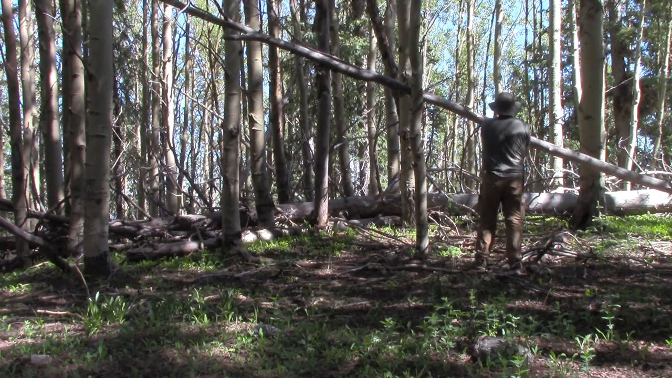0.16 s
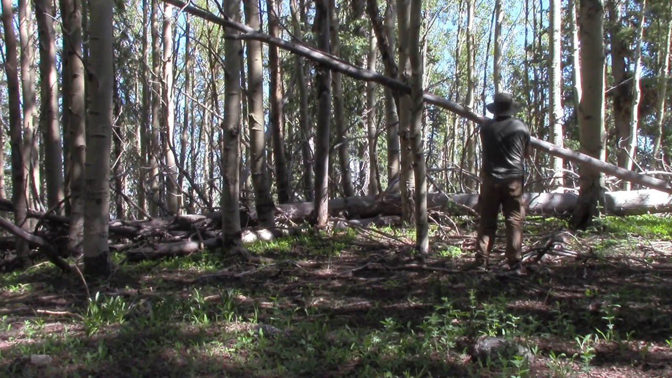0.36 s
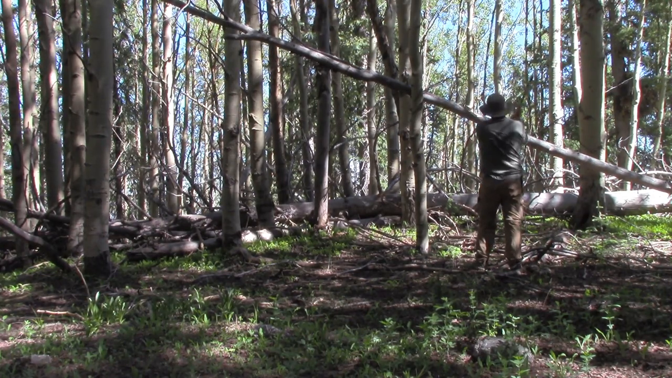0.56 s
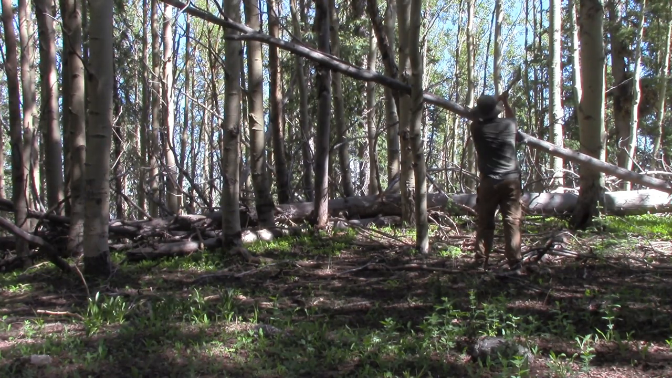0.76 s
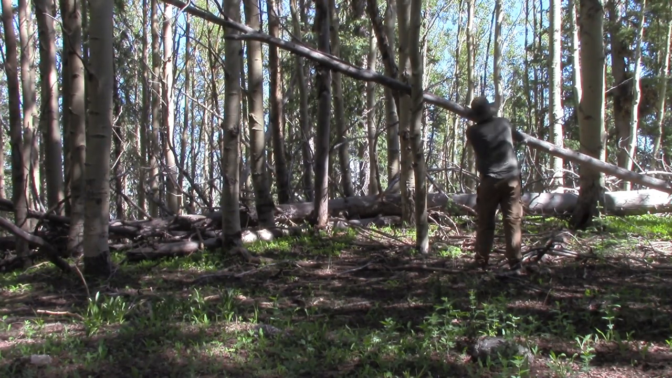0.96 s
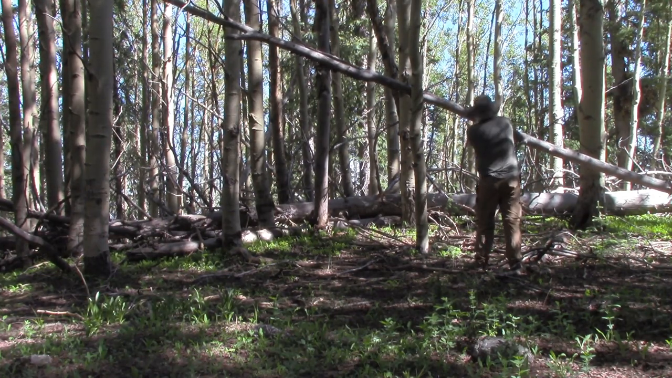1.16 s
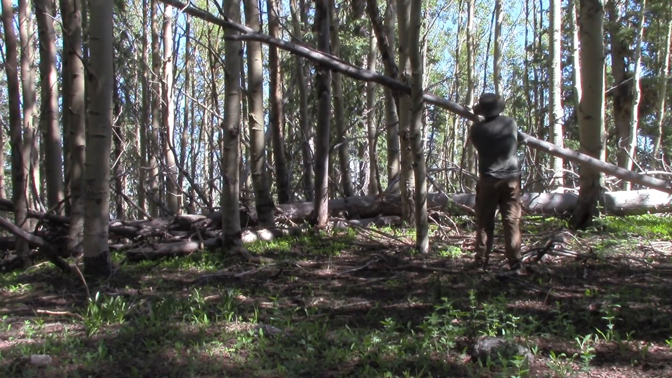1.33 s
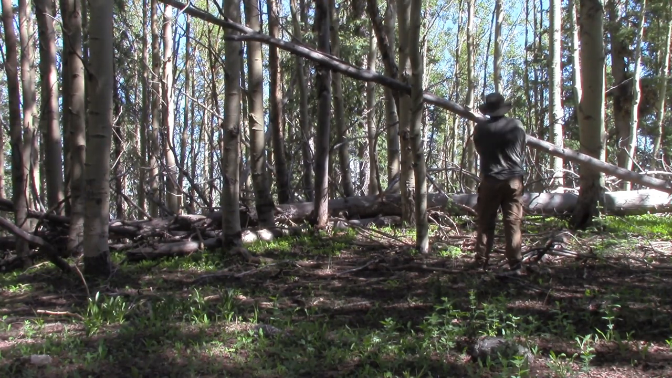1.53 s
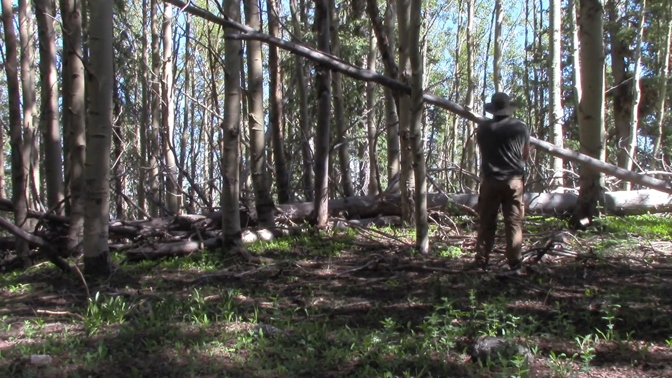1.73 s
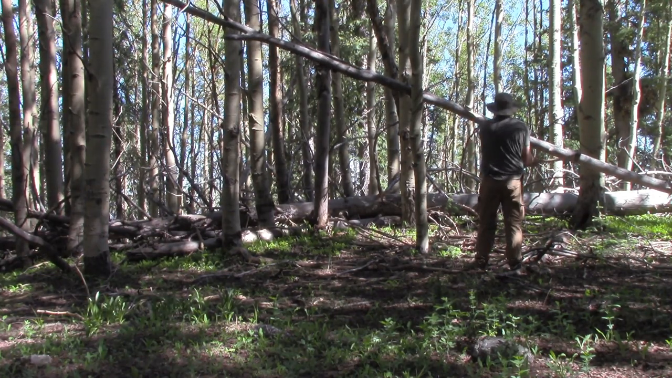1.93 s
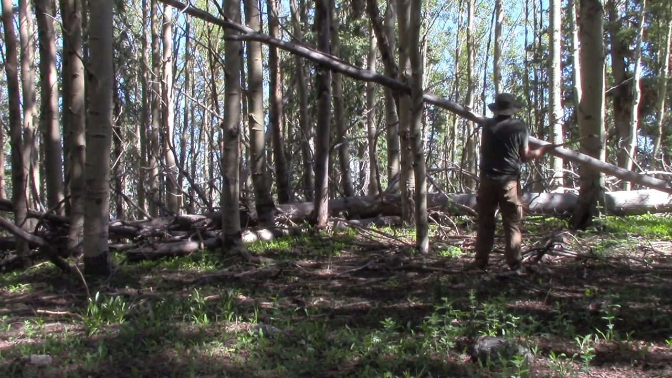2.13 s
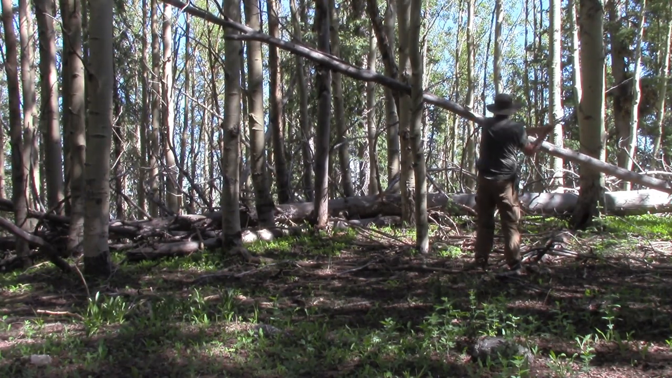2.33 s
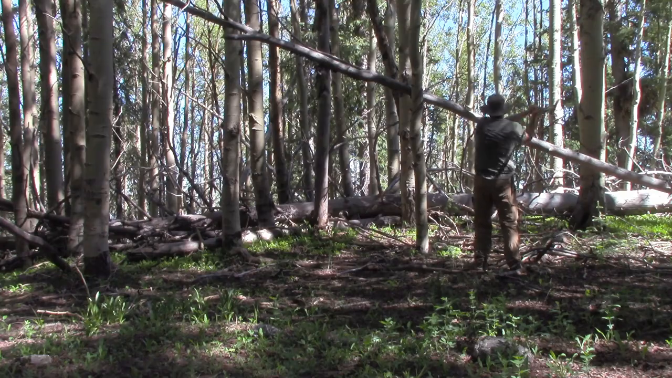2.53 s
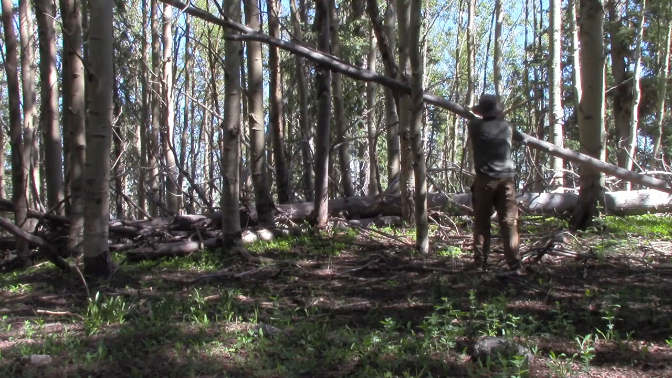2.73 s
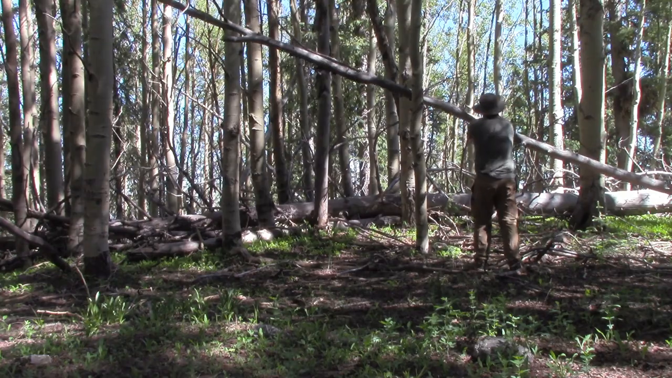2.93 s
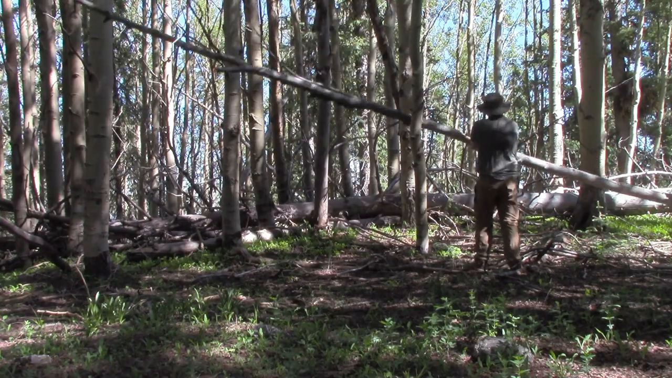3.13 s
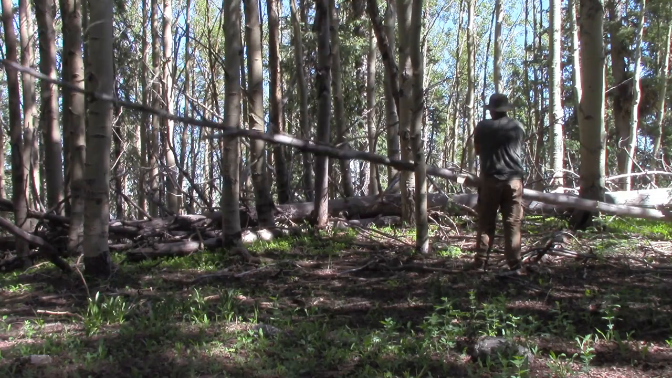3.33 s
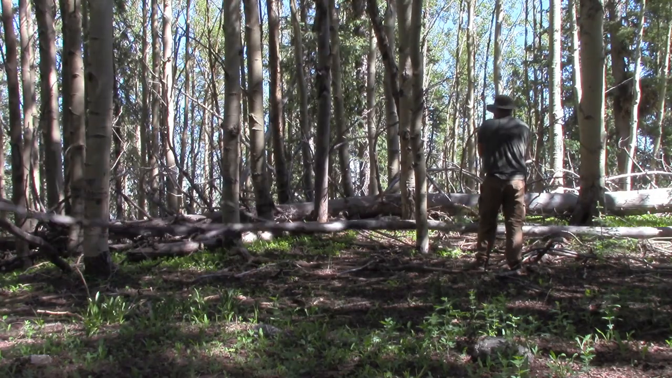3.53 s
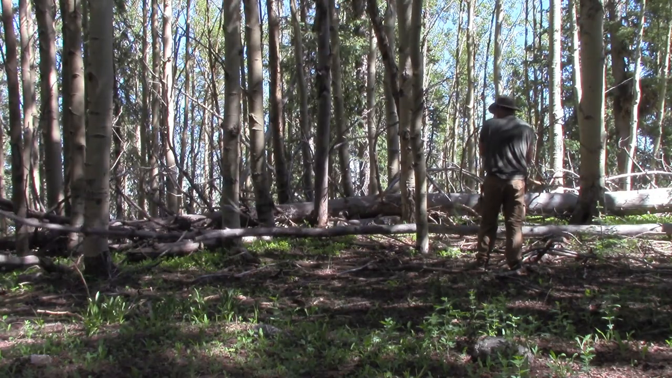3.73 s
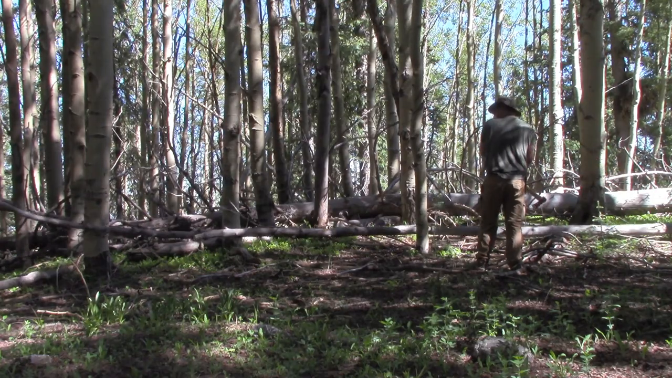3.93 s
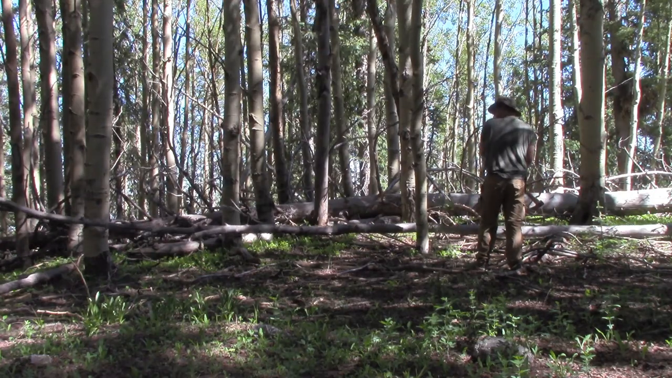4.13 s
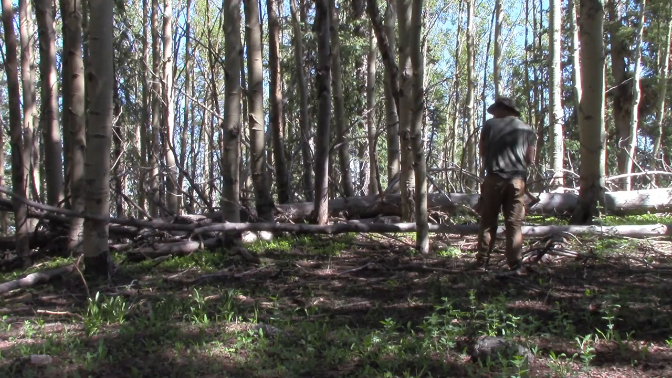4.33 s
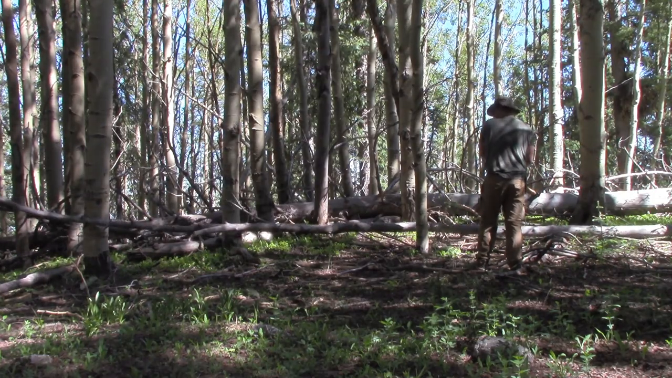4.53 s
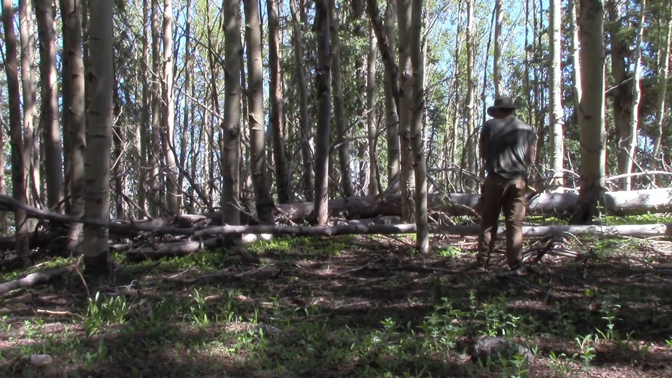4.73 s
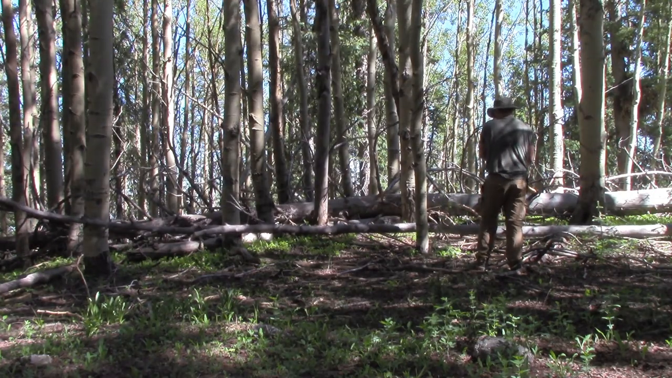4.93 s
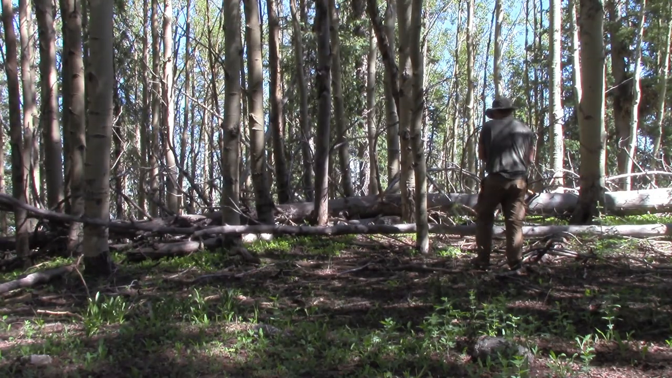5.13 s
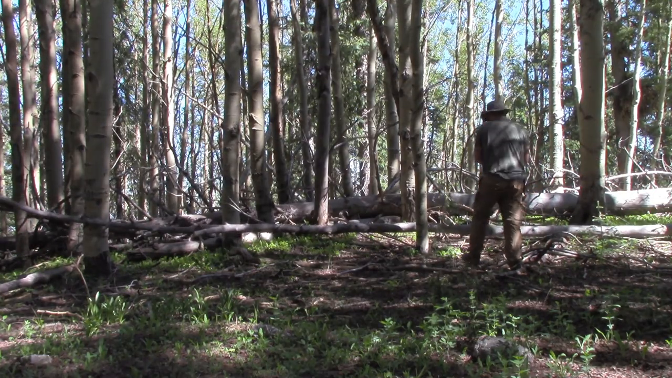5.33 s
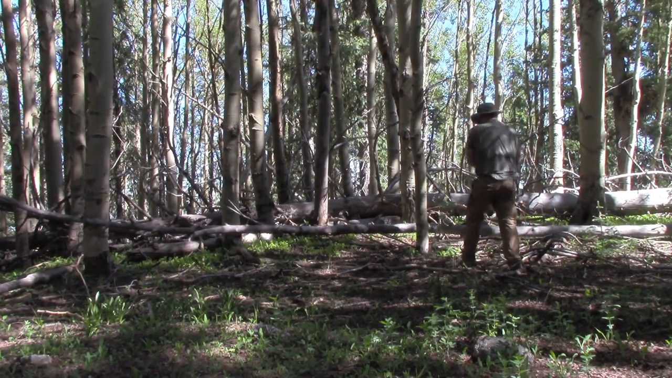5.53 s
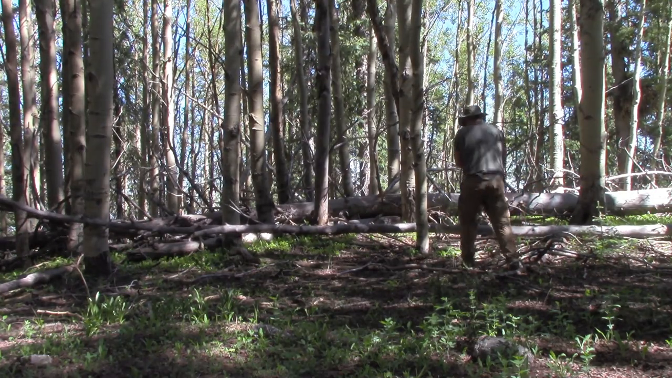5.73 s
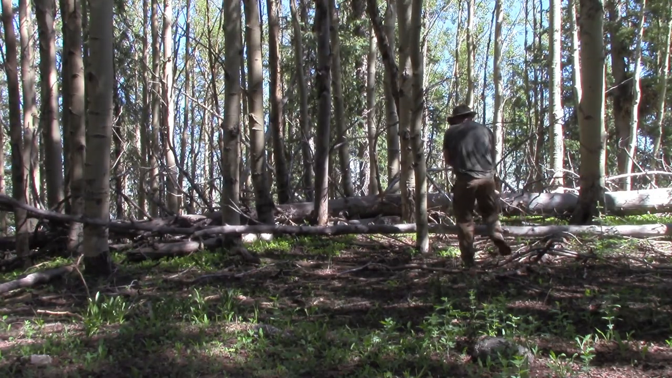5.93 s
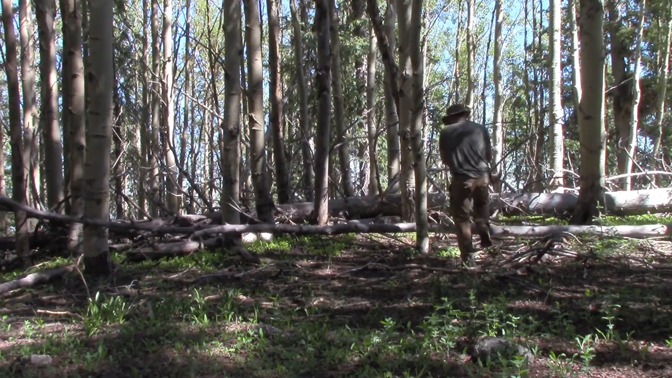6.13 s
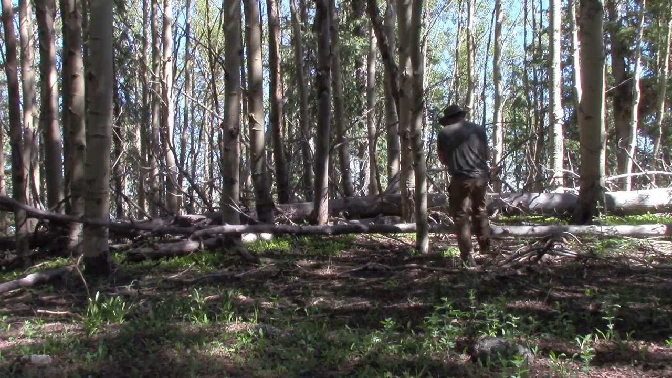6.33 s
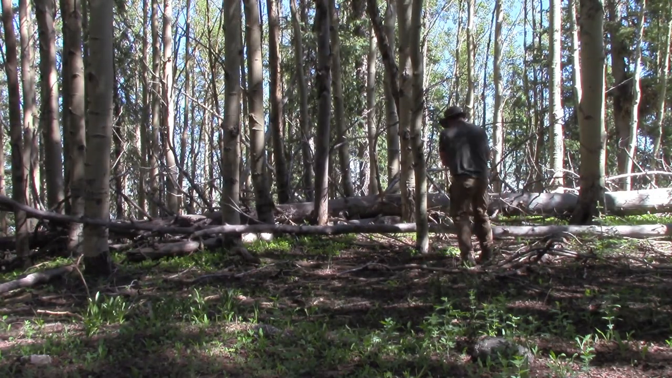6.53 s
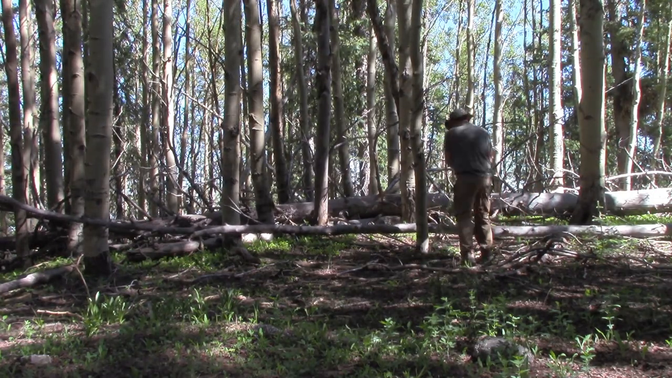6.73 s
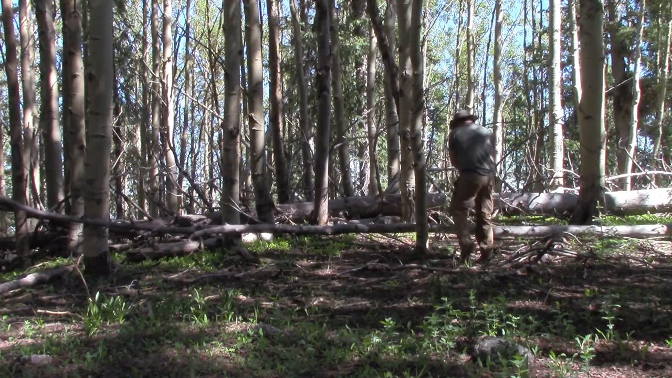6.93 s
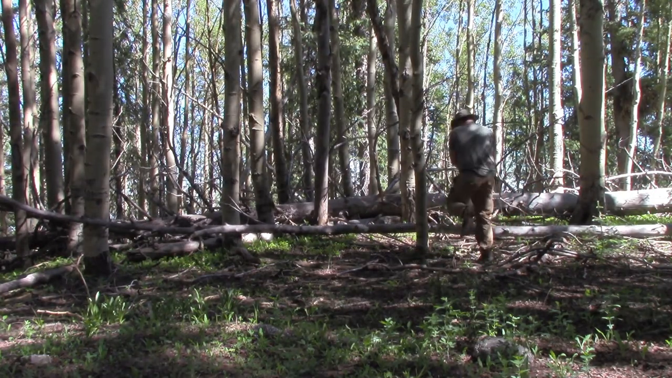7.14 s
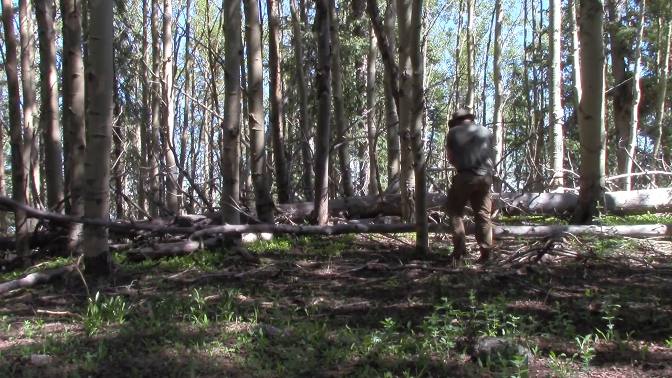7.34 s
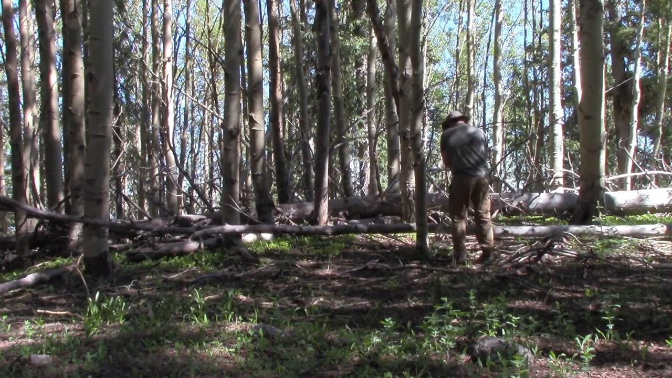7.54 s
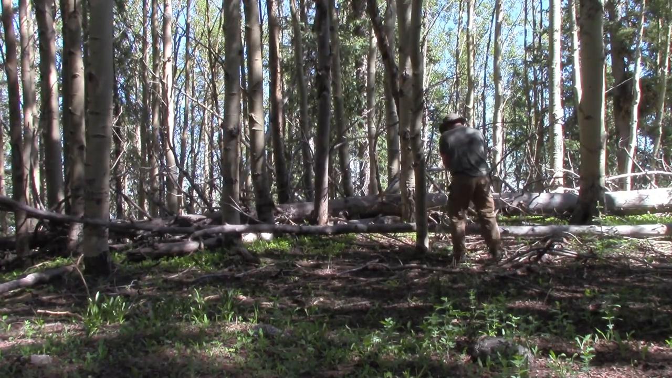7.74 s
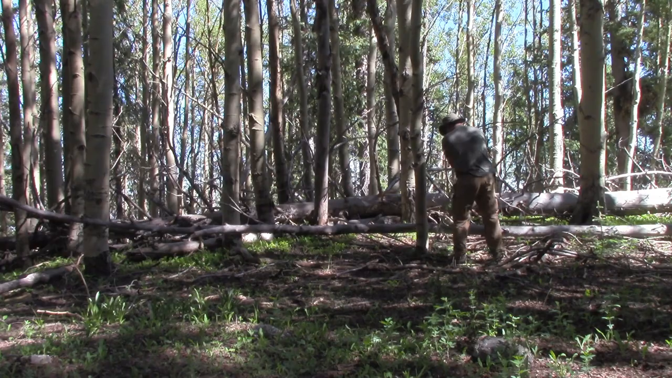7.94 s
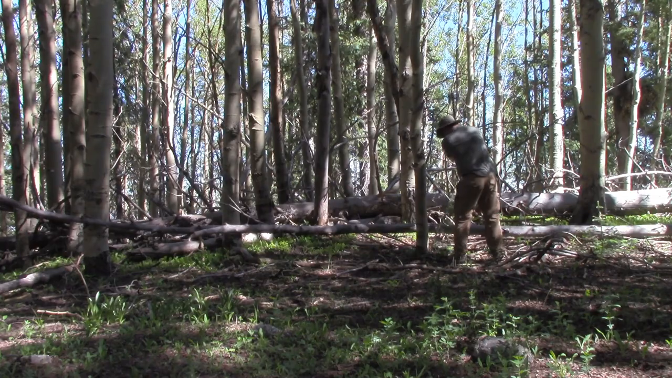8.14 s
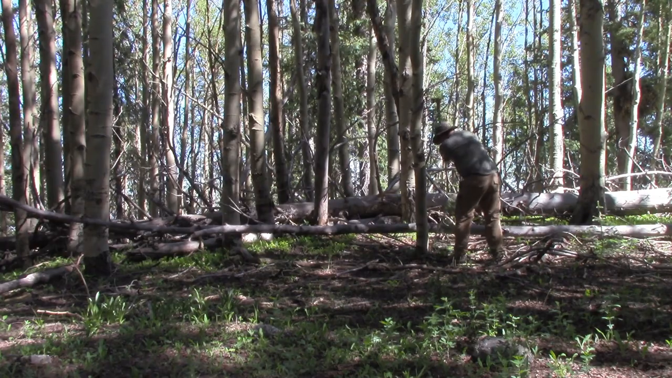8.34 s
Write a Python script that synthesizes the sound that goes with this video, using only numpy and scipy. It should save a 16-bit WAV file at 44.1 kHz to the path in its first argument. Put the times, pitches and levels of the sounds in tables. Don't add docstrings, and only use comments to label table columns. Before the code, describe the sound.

An axe chops twice into a dead leaning trunk in a forest; the wood splits, crashes down with dense cracking, bounces, and boots rustle leaves.

```python
import sys
import numpy as np
from scipy import signal
from scipy.fft import rfft, irfft, next_fast_len
from scipy.io import wavfile
from scipy.ndimage import uniform_filter1d, map_coordinates

SR = 44100
rng = np.random.default_rng(int(sys.argv[2]) if len(sys.argv) > 2 else 0)


def ratio(d):
    e = np.asarray(d, float) / 20
    return 10 ** e


def file_out(sig):
    cols = np.atleast_2d(sig).T
    lim = np.clip(cols, -1, 1)
    pcm = np.round(lim * 32767).astype(np.int16)
    wavfile.write(sys.argv[1], SR, pcm)


N = 373527
TIME = np.arange(N) / SR

# f/Hz, level/dB
AIR_SPECTRUM = [(15, -48.5), (25, -13.5), (123, -12.5), (152, -18), (255, -5), (414, -6.5), (473, -2.5),
                (572, -6), (672, -4.5), (1820, -13), (3220, -15), (3490, -13.5), (5670, -17),
                (15800, -25.5)]

# t/s, effort/dB
BOOT_EFFORT = [(4.9, -48.5), (5.19, -55), (5.43, -52), (5.78, -49), (6.0, -62), (6.57, -64), (6.78, -55.5),
               (7.0, -56.5), (7.19, -62), (7.4, -60), (7.72, -46), (7.97, -59.5), (8.15, -70), (8.47, -65)]
# t/s, peak level/dB, edge level/dB, t60/s, snap f/Hz
FOOTFALLS = [(5.765, -30.5, 5, 0.23, 3000), (5.826, -31, -1.5, 0.23, 3470), (6.053, -37.5, 5, 0.059, 3040),
             (6.575, -35, 6.5, 0.38, 3020), (6.635, -44, 13, 0.14, 3040), (6.9, -33, 8, 0.26, 2460),
             (7.122, -39.5, 5, 0.1, 2980), (7.365, -26.5, 8.5, 0.23, 3320), (7.64, -33, 14, 0.14, 2950)]
# t/s, peak level/dB, t60/s, main mode f/Hz
HEEL_THUMPS = [(6.645, -46.5, 0.065, 380), (6.89, -46, 0.22, 325), (7.37, -39.5, 0.059, 354),
               (7.53, -45.5, 0.3, 298), (7.61, -47.5, 0.17, 333), (7.81, -41, .04, 356)]

# t/s, peak level/dB, edge level/dB, snap f/Hz
BARK_SNAPS = [(0.0014, -37, -22, 2860), (0.6454, -41, -21, 4060), (0.0618, -40, -26.5, 2650),
              (0.1226, -32, 9, 2720), (0.08, -42, -20, 2600), (0.155, -38, -11, 1760),
              (0.178, -37, -2, 4600), (0.399, -42, -15, 2800), (0.2282, -28, 0, 3480),
              (0.243, -34, 3, 3300), (0.3075, -30.5, 5, 5760), (0.3288, -33.5, -0.5, 3440),
              (0.4224, -34.5, 6, 3780), (0.6025, -34.5, 4, 1660), (0.687, -27.5, 6, 3720),
              (0.737, -37, -9, 3000)]
# t/s, peak level/dB, edge level/dB, snap f/Hz
CHIP_SNAPS = [(1.1462, -22, -38, 2900), (1.1614, -31, -35, 2100), (1.2, -32, -26, 2800),
              (1.289, -28.5, -33, 3270), (1.354, -34.5, -31, 1760), (1.4446, -35.5, -35, 1850),
              (1.5229, -36, -24, 2690), (1.6024, -32, -9, 3230), (1.6841, -29, -28, 3020),
              (1.8284, -33, -3, 1390), (1.8791, -37.5, -23, 2160), (1.9515, -40, -9, 4550),
              (2.0994, -43.5, -3, 4700), (2.151, -37, -31, 3160)]
# t/s, peak level/dB, edge level/dB, snap f/Hz
SPLIT_SNAPS = [(2.898, -15, -19.5, 2680), (2.9527, -14.5, -7.5, 3670), (2.9795, -19, -13.5, 3670),
               (3.0456, -26, -41, 2650), (3.0637, -24, -35.5, 4500), (3.1382, -23.5, -48, 1930),
               (3.1597, -18.5, -32, 2550), (3.1787, -18.5, -16, 3670), (3.2595, -12, -14, 2740),
               (3.358, -8, -18, 2950), (3.401, -17.5, -20, 3500), (3.437, -20, -27, 2500)]
# t/s, peak level/dB, edge level/dB, snap f/Hz
CRASH_SNAPS = [(3.496, -11, -6, 3450), (3.5043, -11, -3, 2840), (3.5165, -9, 5, 3600),
               (3.51, -12, -16, 3100), (3.525, -12, -15, 3000), (3.55, -19, -21, 3000),
               (3.5637, -4.5, -5, 1590), (3.582, -3, -1, 2580), (3.5923, -3, -7, 3340),
               (3.613, -3, -34, 1530), (3.6324, -29, -30, 1455), (3.6486, 0, -5, 2670),
               (3.658, -6, -7, 1350), (3.674, -6, -2, 3530), (3.6999, -9, -23, 3000),
               (3.7155, -5, -25, 2300), (3.768, -10.5, 5, 7840), (3.8153, -13, 16, 4640),
               (3.8257, -9, 14, 1780), (3.8379, -9.5, 1, 1820), (3.881, -10, -6, 2510),
               (3.8924, -8, -4, 3160), (3.917, -18, -10, 2800), (3.956, -6, -6, 2720),
               (3.9647, -7, -1, 1570), (3.972, -18, -1, 3800), (3.98, -12.5, -15, 1620),
               (4.0248, -16.5, -22, 1470), (4.0325, -13, -9, 4600), (4.0426, -19, -15, 2950)]
# t/s, peak level/dB, edge level/dB, snap f/Hz
BOUNCE_SNAPS = [(4.139, -20.5, -30.5, 1510), (4.206, -23.5, -21, 3070), (4.22, -16, -20, 1700),
                (4.227, -13.5, -14, 2200), (4.236, -21, -20, 2300), (4.334, -15, -16, 1500),
                (4.3504, -9, -15, 1730), (4.359, -17, -15, 2400), (4.3686, -17, -10.5, 3080),
                (4.435, -22.5, -42.5, 2740), (4.569, -17.5, -11.5, 2760), (4.595, -28, -18, 1600),
                (4.6088, -23.5, 3, 3650), (4.6673, -23.5, 5.5, 2540), (4.708, -19.5, -28.5, 1450),
                (4.78, -21.5, -5.5, 2920), (4.803, -24.5, 12, 2540), (4.8772, -32.5, 3.5, 2030),
                (4.9314, -28.5, 4, 2110), (4.9583, -23.5, 2, 2880), (5.1856, -35, -11, 2550),
                (5.2288, -33, -11.5, 2700), (5.2395, -34, 4, 1660)]
# t/s, peak level/dB, edge level/dB, snap f/Hz
TWIG_SNAPS = [
    (5.4042, -40, -16, 1720),
    (5.462, -31.5, 13.5, 5500),
    (5.678, -39, -15.5, 3000),
    (5.7912, -31, -3, 4500),
    (5.8614, -34, 10, 2850),
    (6.0004, -39, -8, 5900),
]
# t/s, peak level/dB, edge level/dB, snap f/Hz
STALK_TICKS = [(1.1614, -32, 6, 6500), (1.1745, -32, 7, 6500), (1.186, -38, 6, 6580), (1.23, -39, 0, 4500),
               (1.244, -32, 2, 6500), (1.28, -42, 3, 6500), (1.339, -42, 3, 6000), (5.655, -40, 5, 5500),
               (6.157, -42, 3, 6000), (6.6086, -36, -1.5, 2800), (6.624, -35, 8, 5000),
               (6.6574, -31, 3.5, 5030), (6.75, -37, 4, 4000), (7.1357, -28.5, 14, 5560),
               (7.2682, -37.5, -2, 1750), (7.5326, -31.5, 10, 5300), (7.7139, -32.5, 13.5, 5120),
               (7.8092, -30.5, 9, 1540), (7.9683, -40, -8.5, 5230)]
# t/s, peak level/dB, edge level/dB, t60/s, snap f/Hz
CLEAN_BREAKS = [(3.2712, -4.5, 3, 0.017, 4300), (3.2965, -1.5, -1.5, 0.023, 3650),
                (3.3062, -2, -2.5, 0.051, 4840), (3.3522, -2, -8, 0.027, 4600),
                (3.609, -6.5, -5.5, 0.016, 1910), (3.7805, -4, -21, 0.03, 2900),
                (3.9272, -0.5, -13, 0.031, 5370), (3.9365, -5.5, -2, 0.013, 3400),
                (3.9422, 1.5, -10, 0.024, 3400), (3.9498, -5, -13.5, 0.03, 3040),
                (4.0045, -7, -16, 0.026, 3600), (4.3225, -7.5, -2.5, 0.042, 3300),
                (4.342, -2, 0, 0.011, 3150), (4.3795, -2, -11, 0.029, 2930),
                (4.7145, -8.5, -0.5, 0.019, 1870), (0.2295, -27.5, -8, .012, 3600),
                (7.364, -41, 5, .02, 3000), (4.7705, -21, -13.5, .015, 3000), (5.7205, -30, -1, .015, 2000),
                (5.7588, -17, -24, 0.029, 2800), (5.82, -17.5, -3, 0.032, 1700),
                (7.136, -40.5, -20, 0.05, 5400), (4.0232, -12.5, -4.5, 0.011, 7800),
                (4.0335, -9, -13, 0.015, 7950), (4.0435, -18, -3, 0.013, 7900),
                (4.158, -30.5, 10, .03, 8490), (4.421, -15.5, -40, .06, 2700),
                (4.432, -14.5, -40, 0.035, 2800), (3.533, -11, -13.5, .015, 2500),
                (3.61, -6.5, -12.5, .02, 4500), (4.784, -26.5, -17, .015, 3030),
                (5.0035, -33, -1, .012, 3500)]
# t/s, peak level/dB, main mode f/Hz
LOG_KNOCKS = [(3.263, -16.5, 1170), (3.305, -18, 905), (3.57, -17, 382), (3.567, -11, 900),
              (3.58, -10.5, 1150), (3.607, -10.5, 885), (3.632, -10.5, 1240), (3.649, -7, 1220),
              (3.7, -18, 303), (3.885, -21, 372), (3.901, -24, 400), (3.964, -19, 895), (4.14, -31, 543),
              (4.33, -18.5, 1300), (4.353, -21, 364), (4.382, -19.5, 465), (4.426, -21, 382),
              (4.445, -36, 523)]
# t/s, peak level/dB, main mode f/Hz
STICK_KNOCKS = [(0.227, -34, 1140), (1.105, -18.5, 890), (1.146, -22, 710), (1.832, -36.5, 890),
                (3.5632, -1, 870), (4.3805, -9.5, 850), (4.4165, -14, 1150), (4.422, -21, 810),
                (4.57, -32, 486), (4.7078, -19.5, 566), (4.733, -44, 1140), (4.783, -33, 540),
                (4.805, -31, 530), (4.877, -40, 610), (4.935, -34.5, 620), (5.238, -38.5, 400),
                (5.676, -40, 840), (5.77, -34.5, 520), (5.8205, -26.5, 600), (5.825, -28, 513),
                (5.865, -38, 423), (4.226, -18.5, 1100), (4.413, -17, 1500)]
# t/s, level/dB
TEARING_STRAIN = [
    (2.88, -52),
    (3.06, -56.5),
    (3.26, -38.5),
    (3.45, -34.5),
    (3.58, -26),
    (3.9, -32.5),
    (4.12, -41.5),
    (4.41, -42),
    (4.95, -53),
]
# f/Hz, level/dB, t60/s
LIMB_MODES = [(541, -10, 0.25), (1160, -10, 0.2), (1410, -17, .1), (1900, -3, .1), (1990, 0, 0.22),
              (2560, -2, 0.14), (2900, -6, 0.07), (3200, -10, .1), (4000, -8, 0.06), (4600, -5, 0.05)]

# t/s, peak level/dB, edge level/dB, t60/s, snap f/Hz
AXE_BITES = [(1.031, -34, -15, .03, 1500), (1.0344, -5.5, -8, 0.06, 2660), (1.0425, -14, -22, .03, 2750),
             (1.047, -11.5, -14, .05, 2700), (1.062, -23, -20, .06, 2300), (1.075, -19, -22, .1, 2800),
             (1.092, -20, -27, 0.09, 2200), (1.118, -25, -22, .1, 2600), (2.8413, -4, -5, 0.03, 2590),
             (2.8424, -1.5, -2, 0.022, 2700), (2.848, -12.5, -4, 0.068, 2870),
             (2.871, -13.5, -10.5, 0.047, 3300)]
# t/s, peak level/dB
AXE_BLOWS = [
    (1.0355, -5.5),
    (2.8398, -5),
]
# f/Hz, level/dB, t60/s
WHOLE_TRUNK_MODES = [(595, 2.5, 0.042), (671, -6, 0.14), (885, 3, 0.048), (996, -2, 0.06),
                     (1260, -11.5, 0.051), (1700, -9, 0.07), (2050, -7, 0.042), (2800, -13, 0.055)]
# f/Hz, level/dB, t60/s
CUT_TRUNK_MODES = [(560, -8, .07), (662, -1, 0.1), (870, 3, 0.07), (1080, -2, 0.045)]

# t/s, peak level/dB
LOW_THUMPS = [
    (2.842, -31),
    (3.307, -38),
    (3.565, -25.5),
    (3.6, -32),
    (3.943, -39),
    (4.343, -41),
]

# t/s, wingbeat f/Hz, level/dB
FLY_PATH = [
    (5.9, 196, -75),
    (6.3, 194.4, -63),
    (6.8, 196, -65.5),
    (7.5, 191.9, -63),
    (8, 188, -69),
    (8.47, 188.5, -66.5),
]
# multiple of the wingbeat, level/dB
WING_HARMONICS = [(2, 0), (3, -9), (4, -3), (5, -3.5), (6, -10)]

# f/Hz, level in 1 Hz/dB
KNOCK_SPECTRUM = [(20, -44), (60, -41), (150, -25), (300, -6.5), (700, -10.5), (1200, -7.5), (2200, -14),
                  (5000, -46)]
# f/Hz, level in 1 Hz/dB
SNAP_SPECTRUM = [(400, -21.5), (1200, 0), (2500, -4), (4500, -4.5), (6500, -9), (12000, -19)]
# f/Hz, level in 1 Hz/dB
EDGE_SPECTRUM = [(2500, -38), (5500, -10), (8200, -2), (11000, -12), (15500, -20)]
# f/Hz, level in 1 Hz/dB
SPLINTER_SPECTRUM = [(710, -37), (1200, -13.5), (2340, -6), (3340, -4.5), (4330, -11.5), (5320, -12),
                     (6450, -16.5), (8640, -14), (15800, -32.5)]
# f/Hz, level in 1 Hz/dB
LEAF_SPECTRUM = [(710, -32), (1200, -15), (2420, -13), (2610, -6.5), (4930, -7), (6320, -7.5), (8360, -2),
                 (10900, -11.5), (12300, -10.5), (15800, -20)]

# f/Hz, t60/s
FOREST_DECAY = [(150, 0.91), (400, 1.25), (1000, 1.29), (2800, 1.02), (7000, 1), (14000, 0.97)]
# f/Hz, correlation
STEREO_LIKENESS = [(30, 0.59), (130, 0.59), (400, 0.81), (1400, 0.53), (4000, 0.62), (8000, 0.84),
                   (15000, 1)]
# f/Hz, level/dB
STEREO_LEAN = [(100, -0.5), (250, 3.5), (700, 1), (2400, 0)]


def unit(x):
    return x / np.sqrt(np.mean(x ** 2, axis=-1, keepdims=True) + 1e-20)


def along(points, hz):
    f, v = np.transpose(points)
    return np.interp(np.log(hz + 1), np.log(f + 1), v)


def curves(rows):
    s, *columns = np.transpose(rows)
    return [np.interp(TIME, s, column, -120, -120) for column in columns]


def wobble(rate):
    knots = rng.standard_normal(int(N * rate / SR) + 4)
    return map_coordinates(knots, [np.arange(N) * rate / SR])


def filtered(x, response):
    n = x.shape[-1]
    size = next_fast_len(n + 4096)
    return irfft(rfft(x, size) * response(np.fft.rfftfreq(size, 1 / SR)), size)[..., :n]


def coloured(x, spectrum):
    closed = spectrum + [(spectrum[-1][0] * 1.2, -120)]
    return unit(filtered(x, lambda hz: ratio(along(closed, hz))))


def resonance(hz, centre_hz, width_hz):
    damping = 1j * hz * width_hz
    return damping / (centre_hz ** 2 - hz ** 2 + damping)


def rung(x, modes):
    y = filtered(x, modes)
    return y * np.linalg.norm(x) / np.linalg.norm(y)


def place(rows, shape):
    out = np.zeros((2, N + SR))
    t = np.arange(SR // 5) / SR
    for s, db, *rest in rows:
        sound = shape(t, rng.standard_normal((3, 2, len(t))), *rest)
        peak = np.abs(sound[0]).max()
        out[:, round(s * SR):][:, :len(t)] += ratio(db - 0.5) * sound / peak
    return out[:, :N]


def snaps(rows, rise, ring, crack, uneven_db=2.2, plain=.3, click=0):
    def snap(t, noise, edge_db, t60, snap_hz):
        fibres = ratio(uneven_db * unit(uniform_filter1d(noise[2, 0], size=90)))
        burst = 1 + crack * np.exp(-t / .002)
        start = -np.expm1(-t / (rise * t60)) * fibres * burst
        tear = coloured(noise[0], SNAP_SPECTRUM) * ratio(-60 * t / t60) * start

        def piece(hz):
            broad = .6 * resonance(hz, snap_hz, .35 * snap_hz)
            narrow = ring * resonance(hz, snap_hz, .03 * snap_hz)
            return plain + broad + narrow

        edge = coloured(noise[1], EDGE_SPECTRUM) * ratio(edge_db - 60 * t / (.8 * t60)) * start
        jerk = ratio(-60 * t / (.2 * t60)) * np.cos(2 * np.pi * snap_hz * t)
        parting = click * np.array([[1], [.3]]) * jerk
        return rung(tear, piece) + edge + parting
    return place(rows, snap)


def knocks(rows, body):
    def knock(t, noise, t60, main_hz):
        attack = -np.expm1(-t / .001) * (1 + np.exp(-t / .004))
        blow = coloured(noise[0], KNOCK_SPECTRUM) * ratio(-60 * t / t60) * attack
        return rung(blow, lambda hz: body + 2.3 * resonance(hz, main_hz, 0.21 * main_hz))
    return place(rows, knock)


def struck_modes(modes, t, noise):
    total = 0
    for k, (hz, db, t60) in enumerate(modes):
        level = ratio(db + 0.58 * noise[2, :, k, None] - 60 * t / t60)
        total = total + level * np.sin(2 * np.pi * hz * t + .5 * noise[1, :, k, None])
    return total


def crackle(body_db, bright_db, bright, rate, spread_db, wash, clump_db):
    sizes = ratio(spread_db * np.minimum(rng.exponential(size=N), 3))
    hits = (rng.random(N) < rate / SR) * sizes
    life = np.exp(-np.arange(SR // 100) / SR / .0014)
    grains = unit(signal.fftconvolve(hits, life)[:N])
    env = ratio(clump_db * wobble(45)) * (wash + grains)
    fine = coloured(env * rng.standard_normal((2, N)), bright)
    dull_env = np.sqrt(env) * ratio(2.5 * wobble(30))
    dull = coloured(dull_env * rng.standard_normal((2, N)), KNOCK_SPECTRUM)
    return ratio(bright_db + 1.0) * fine + ratio(body_db - 2.5) * dull


def air():
    level_db = -58 + 0.14 * wobble(3.93) + 0.58 * wobble(1.34)
    return ratio(level_db) * coloured(rng.standard_normal((2, N)), AIR_SPECTRUM)


def earlier_blow_tail():
    weight_db = -48.5 + 17.5 * np.expm1(-TIME / 0.44)
    return (TIME < 1) * crackle(weight_db, -65, LEAF_SPECTRUM, rate=400, spread_db=3, wash=2, clump_db=1)


def boots():
    effort_db, = curves(BOOT_EFFORT)
    weight_db = -52.5 + 0.36 * (effort_db + 42.0)
    weight_db = np.where(effort_db > -99, weight_db, -120)
    walk = crackle(weight_db, effort_db, LEAF_SPECTRUM, rate=900, spread_db=3.3, wash=1.3, clump_db=1.2)
    footfalls = snaps(FOOTFALLS, rise=.2, ring=0, crack=0)
    return earlier_blow_tail() + walk + footfalls + knocks(HEEL_THUMPS, body=.03)


def breaking_pieces():
    stages = [(BARK_SNAPS, 0.048), (CHIP_SNAPS, 0.054), (SPLIT_SNAPS, 0.071), (CRASH_SNAPS, 0.043),
              (BOUNCE_SNAPS, 0.04), (TWIG_SNAPS, 0.041), (STALK_TICKS, .009)]
    pieces = []
    for rows, t60 in stages:
        pieces += [(s, db, edge_db, t60 * (3000 / hz) ** 0.37, hz) for s, db, edge_db, hz in rows]
    return snaps(pieces, rise=0.025, ring=0.74, crack=0.47)


def clean_breaks():
    return snaps(CLEAN_BREAKS, rise=0.01, ring=0.92, crack=0.76, uneven_db=0.7, plain=0.23, click=2.3)


def knocking_logs():
    rows = [(s, db, 0.15, hz) for s, db, hz in LOG_KNOCKS]
    rows += [(s, db, 0.028, hz) for s, db, hz in STICK_KNOCKS]
    return knocks(rows, body=.3)


def tearing_fibres():
    strain_db, = curves(TEARING_STRAIN)
    body_db = 0.5 - 42.0 + 1.13 * (strain_db + 42.0)
    return crackle(body_db, strain_db, SPLINTER_SPECTRUM, rate=500, spread_db=3.2, wash=.4, clump_db=2.2)


def landing_limb():
    def limb(t, noise):
        return struck_modes(LIMB_MODES, t, noise) * -np.expm1(-t / .001)
    return place([(4.714, -14)], limb)


def falling_tree():
    return breaking_pieces() + knocking_logs() + tearing_fibres() + landing_limb() + clean_breaks()


def axe_blows():
    sink_s, thud_db, thud_t60 = 0.0012, -2.5, 0.04
    jolt_s, jolt_db, jolt_hz, jolt_width_s = 0.0242, -11, 295, 0.0037

    def blow(t, noise, modes):
        thud = ratio(thud_db - 60 * t / thud_t60) * coloured(noise[0], KNOCK_SPECTRUM)
        swell = np.exp(-((t - jolt_s) / jolt_width_s) ** 2)
        jolt = ratio(jolt_db) * swell * np.sin(2 * np.pi * jolt_hz * t)
        return (struck_modes(modes, t, noise) + thud) * -np.expm1(-t / sink_s) + jolt

    trunks = [WHOLE_TRUNK_MODES, CUT_TRUNK_MODES]
    return place([(*row, modes) for row, modes in zip(AXE_BLOWS, trunks)], blow)


def axe():
    bites = snaps(AXE_BITES, rise=0.0035, ring=0.475, crack=0.85, plain=0.38, click=2.7)
    return bites + axe_blows()


def low_thumps():
    return place(LOW_THUMPS, lambda t, noise: np.exp(-(t / 0.00097 - 2) ** 2) * [[1], [0]])


def fly():
    hz, db = curves(FLY_PATH)
    phase = 2 * np.pi * np.cumsum(hz * (1 + .012 * wobble(25))) / SR
    drone = 0
    for k, level in WING_HARMONICS:
        loudness = ratio(db + level + 2.5 * wobble(7)) * (.8 + .6 * wobble(30))
        drone = drone + loudness * np.sin(k * phase)
    return drone


def ticking_insect():
    pulses = .3 + np.sin(np.pi * 24 * TIME + wobble(9)) ** 2
    beat = pulses * ratio(2 * wobble(20)) * (TIME > 8.02)
    rasp = [(9300, -39.5), (9900, -1.0), (10400, -19.0), (10900, -3.5), (11500, -37.5)]  # f/Hz, level/dB
    return ratio(-71) * beat * coloured(rng.standard_normal(N), rasp)


def forest(x, early_db, late_db, size, top_hz):
    hz, _, z = signal.stft(x, SR, nperseg=512, noverlap=448)
    t = np.arange(SR // 64) * 64 / SR
    t60 = along(FOREST_DECAY, hz)[:, None]
    late = ratio(late_db - 60 * t / t60) ** 2
    early = ratio(early_db - 60 * t / (.22 * t60)) ** 2
    linger = (late + early) * (t > .006)
    lumps = ratio(4 * rng.standard_normal(len(t)))
    energy = uniform_filter1d(np.abs(z) ** 2, size=size, axis=0)
    held = signal.fftconvolve(energy, linger * lumps / 20, axes=1)[:, :z.shape[1]]
    fresh = signal.stft(rng.standard_normal((2, N)), SR, nperseg=512, noverlap=448)[2]
    tail = np.sqrt(np.abs(held)) * fresh / np.abs(fresh).mean()
    wet = signal.istft(tail, SR, nperseg=512, noverlap=448)[1][:, :N]

    def scatter(hz):
        low_cut = 1 / (1 + (190 / (hz + 1)) ** 4)
        return low_cut / np.hypot(1, hz / top_hz)
    return filtered(wet, scatter)


def microphone_pair(pair):
    def blend(hz):
        angle = np.arccos(np.clip(along(STEREO_LIKENESS, hz), -1, 1)) / 2
        return np.array([np.cos(angle), np.sin(angle)])

    mid, side = filtered(pair, blend)
    left_right = np.array([mid + side, mid - side])
    return filtered(left_right, lambda hz: ratio(along(STEREO_LEAN, hz) * [[.5], [-.5]]))


def scene():
    litter, wood, chops = boots(), falling_tree(), axe()
    direct = [[1], [.6]] * (chops + wood + litter)
    wood_out = wood[0] * ratio(-6 * (TIME > 5.3))
    axe_tail = forest(chops[0], early_db=-3.0, late_db=-14.5, size=4, top_hz=8990)
    wood_tail = forest(wood_out, early_db=-2.5, late_db=-22.0, size=11, top_hz=20000)
    insects = [[1], [.3]] * (fly() + ticking_insect())
    return microphone_pair(direct + axe_tail + wood_tail + insects + air() + low_thumps())


def low_pass(x):
    return signal.sosfilt(signal.butter(12, 16820, fs=SR, output="sos"), x)


def record(dry):
    limited = dry / (1 + np.abs(dry / .95) ** 5) ** (1 / 5)
    mix = filtered(limited, lambda hz: hz < 15900)
    return low_pass(mix)


dry = scene()
out = record(dry)
file_out(out)
```